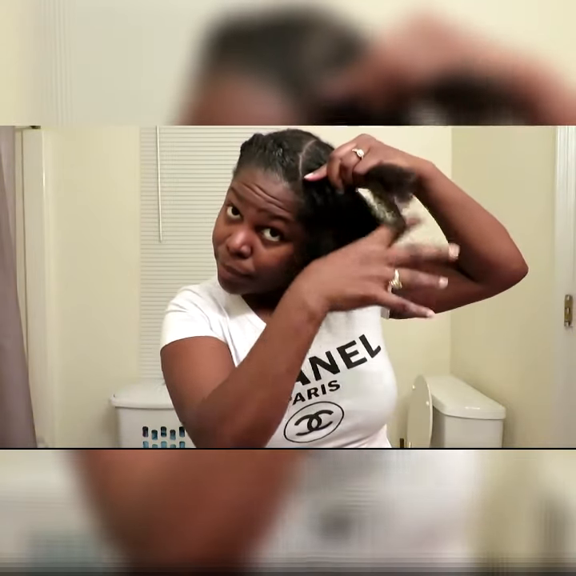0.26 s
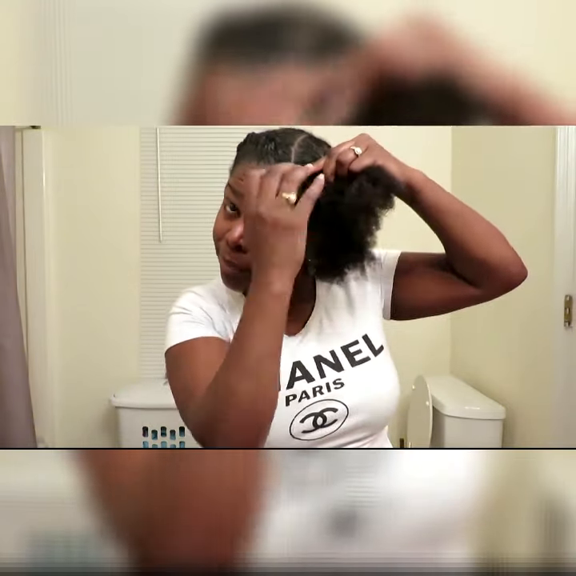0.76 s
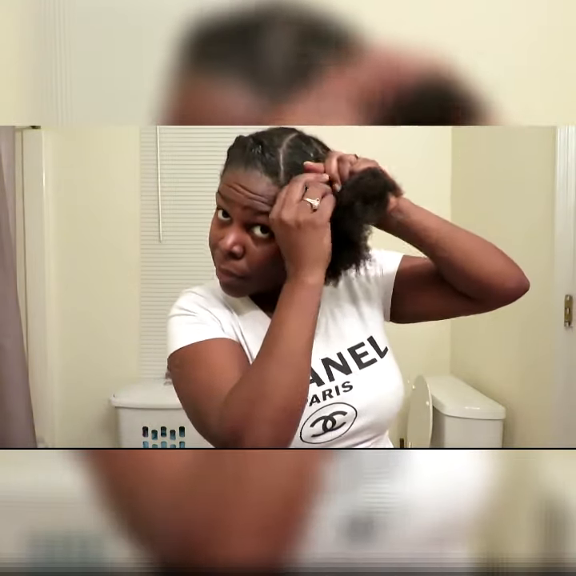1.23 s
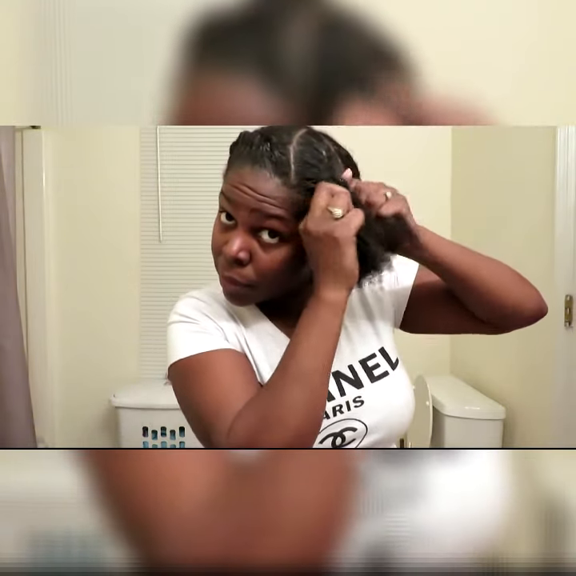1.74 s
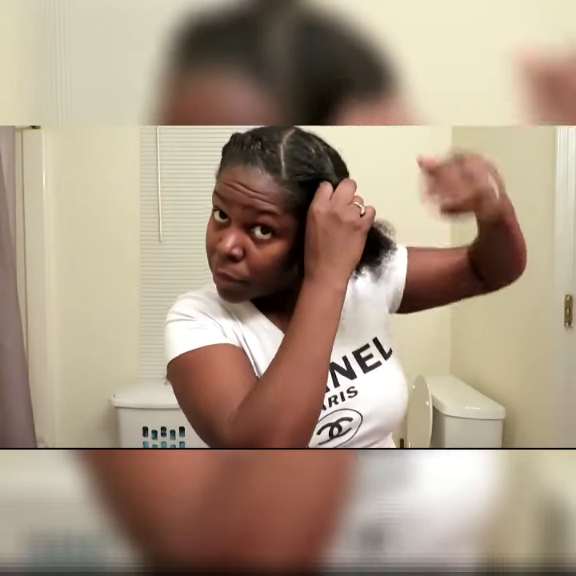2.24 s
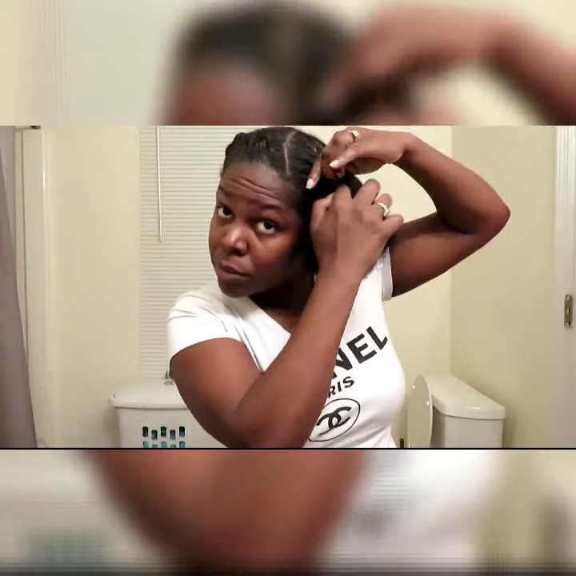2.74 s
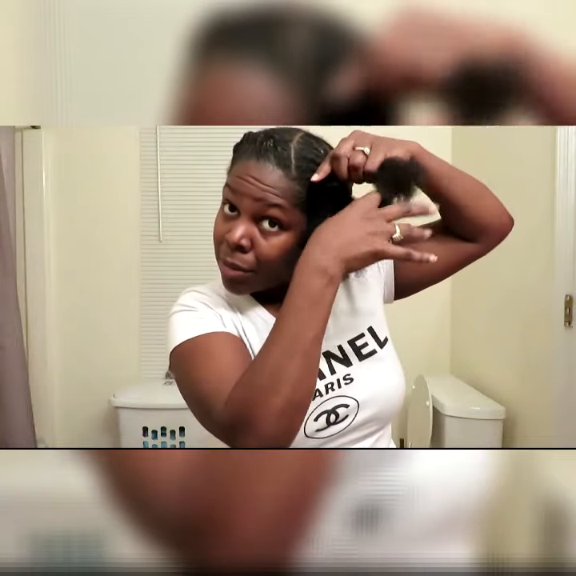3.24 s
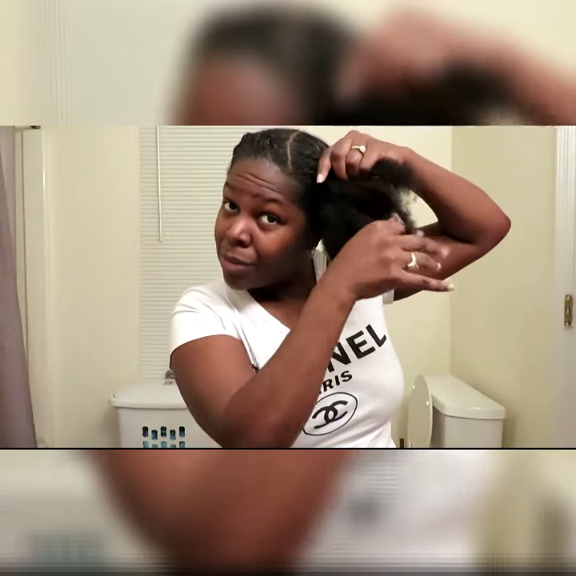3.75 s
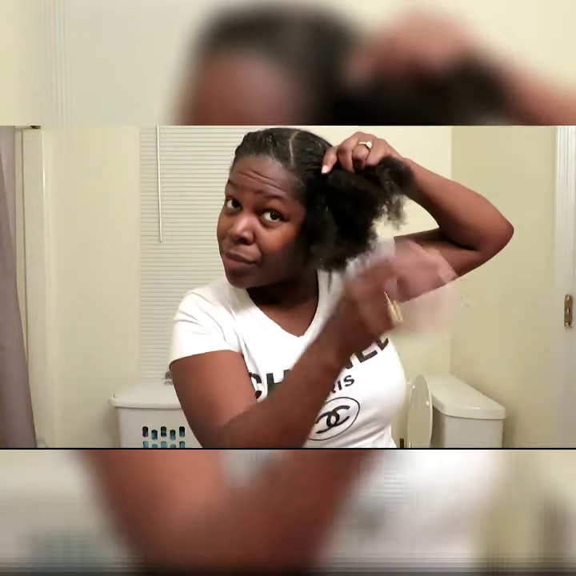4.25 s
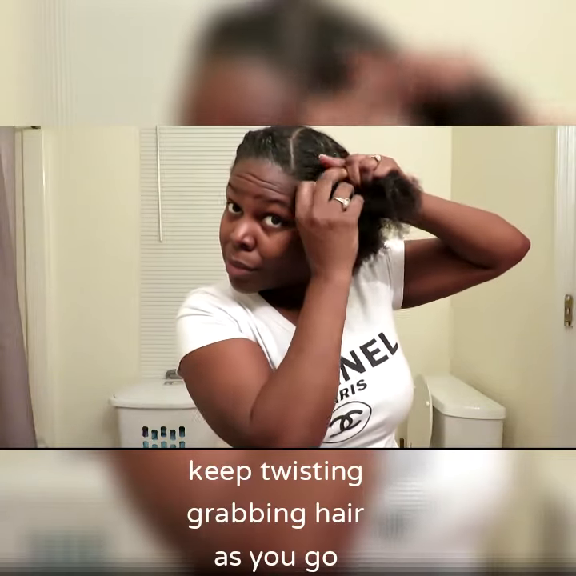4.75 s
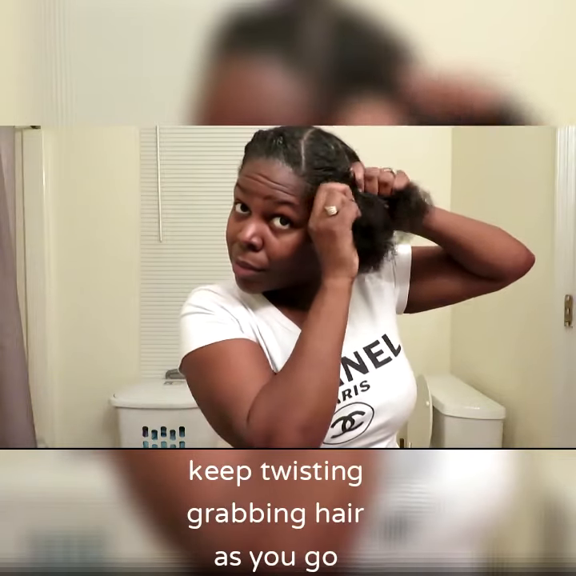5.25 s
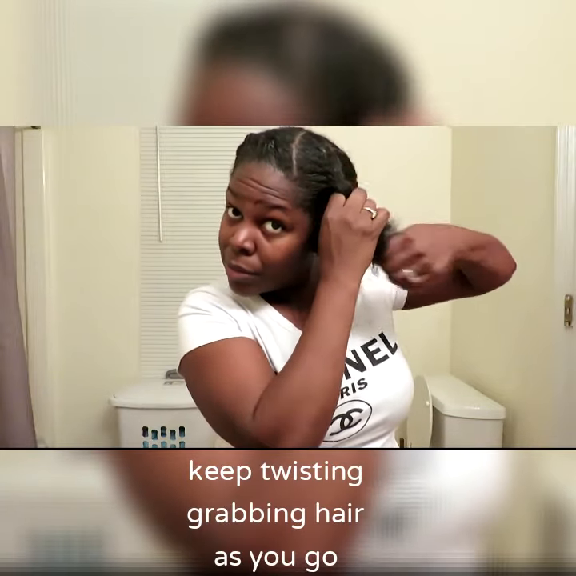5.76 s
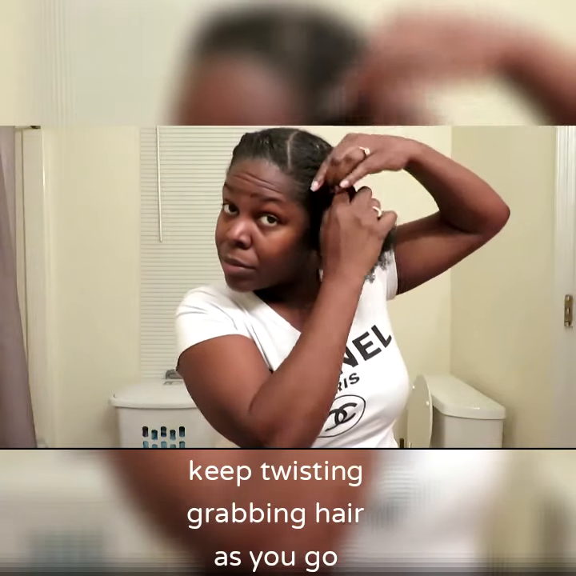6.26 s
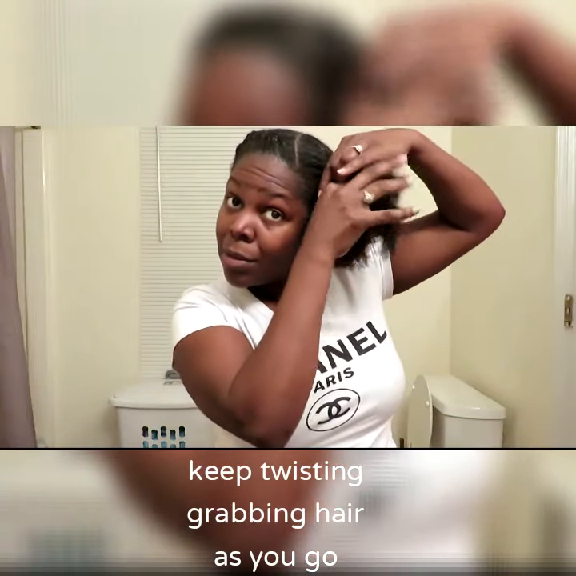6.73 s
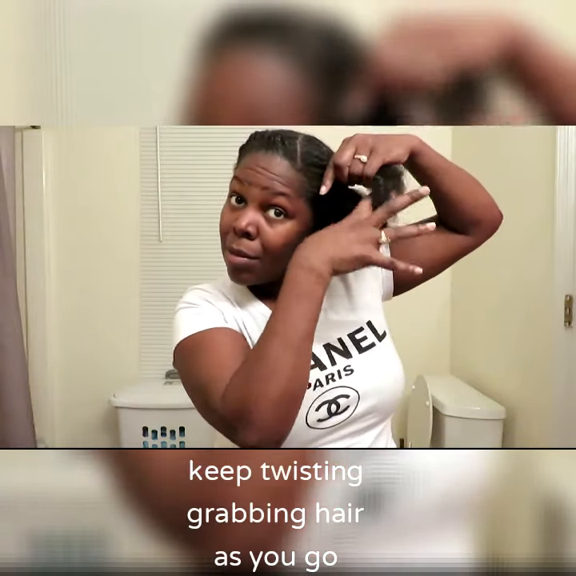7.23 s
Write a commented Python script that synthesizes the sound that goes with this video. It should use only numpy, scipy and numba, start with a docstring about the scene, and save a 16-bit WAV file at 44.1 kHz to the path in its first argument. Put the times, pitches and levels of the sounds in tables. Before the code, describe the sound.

A ventilation fan hums low in a small bathroom while bath water drips and laps quietly, then gets stirred, scooped and splashed with bubbling gurgles.

```python
"""Bath water in a small, hard-walled bathroom, heard in mono: bubbles and drips near, splashes deeper in the room.
A ventilation fan hums throughout. At first the water laps and drips quietly, with a few soft thuds of the tub.
From about 4.5 s it is stirred, scooped and splashed: trapped air rings as single bubbles and gurgling clouds,
spray patters back on the surface, foam sizzles and the tub thuds again. Reflections smear all the water."""
import sys
import numpy as np
from scipy import signal
from scipy.fft import rfft, irfft
from scipy.io import wavfile
from numba import njit

SR = 44100
rng = np.random.default_rng(int(sys.argv[2]) if len(sys.argv) > 2 else 0)


def output_pcm(signal):
    """Save a mono or channel-first signal as 16-bit PCM at the path in sys.argv[1].

    Samples are clipped to [-1, 1] before scaling.
    """
    pcm = np.clip(np.atleast_2d(signal).T, -1, 1) * 32767
    wavfile.write(sys.argv[1], SR, np.round(pcm).astype(np.int16))


N = 330428
T = np.arange(N) / SR  # [s]
BINS = np.maximum(np.fft.rfftfreq(N, 1 / SR), 1)  # [Hz]


def undb(db):
    """Decibels to gain."""
    return 10 ** (np.asarray(db) / 20)


def unit(x):
    """Scale to an rms of one."""
    return x / np.sqrt(np.mean(x ** 2))


def colour(x, points):
    """Filter by a spectrum of (frequency [Hz], level [dB]) points, joined along log frequency."""
    hz, db = np.transpose(points)
    gain = undb(np.interp(np.log(BINS), np.log(hz), db))
    return irfft(rfft(x) * gain, N)


def add(out, s, x):
    """Mix x into out from time s on."""
    i = int(np.clip(s * SR, 0, N - 1))
    out[i:i + len(x)] += x[:N - i]


@njit
def rings(size, starts, hz, cycles, gains, glide, swell):
    """Damped sines: build up over swell cycles, fall 60 dB in so many cycles, pitch rising by the share glide."""
    out = np.zeros(size)
    for k in range(len(starts)):
        first, life = int(starts[k] * SR), cycles[k] * SR / hz[k]
        z = gains[k] + 0j
        # turn and decay per sample, and the slow speeding up of the turn
        p = np.exp((2j * np.pi * hz[k] / SR) - np.log(1000) / life)
        bend = np.exp(2j * np.pi * hz[k] / SR * glide / life)
        for i in range(first, min(size, first + int(life))):
            out[i] += z.imag * min(1., (i - first) * hz[k] / SR / swell)
            z *= p
            p *= bend
    return out


def patter(count, low_hz, high_hz, cycles, scatter_db, glide=0.25, swell=2.26, largest=3.95):
    """A steady rain of tiny bubbles, the higher ones louder; scatter_db makes a few stand out."""
    when, pitch, life, size = rng.random((count, 4)).T
    hz = np.minimum(low_hz * (high_hz / low_hz) ** pitch, SR * .45)
    sizes = undb(scatter_db * np.minimum(-np.log(1 - size), largest)) * hz / high_hz
    return rings(N, when * N / SR, hz, cycles * (0.77 + life), sizes, glide, swell)


def clumps(depth_db, rate=22):
    """Gain of drops that come in irregular bunches, so many a second."""
    knots = rng.standard_normal(400)
    return unit(undb(depth_db * np.interp(T * rate, np.arange(len(knots)), knots)))


# A bubble at the reference pitch [Hz]: build-up and 60 dB fall [s]; both shorten with pitch by the exponent.
BUBBLE_HZ = 1500
BUBBLE_RISE_S, BUBBLE_T60_S, BUBBLE_SHORTEN = 0.0091, 0.032, 0.35
# Its pitch wavers as it rises: wobbles [1/s] and depth [share of the pitch], both at the reference pitch.
WOBBLE_RATE, WOBBLE = 264, 0.034


def bubble(hz, glide=0.18):
    """One bubble swells, rings and dies away, its pitch chirping up and wavering, more so if it is small."""
    age = T[:SR // 16]
    scale = (BUBBLE_HZ / hz) ** BUBBLE_SHORTEN
    life = BUBBLE_T60_S * scale
    wobble = np.interp(age * WOBBLE_RATE / scale, np.arange(64), rng.standard_normal(64))
    pitch = hz * (1 + glide * np.minimum(age / life, 1) + WOBBLE / scale * wobble)
    rise = np.sin(np.pi / 2 * np.minimum(age / (BUBBLE_RISE_S * scale), 1)) ** 2
    decay = np.exp(-np.log(1000) * age / life)
    return rise * decay * np.sin(2 * np.pi * np.cumsum(pitch) / SR)


# The clearest single bubbles and drips near the microphone:
# (time [s], starting pitch [Hz], level before gain and pitch weighting [dB])
BUBBLE_EVENTS = [(.031, 2060, -39), (.074, 1775, -37), (0.073, 2250, -40), (0.096, 4780, -43.5),
                 (0.196, 1486, -32), (.2, 2230, -33), (.258, 1375, -36.5), (.264, 647, -40.5),
                 (.277, 2620, -35.5), (.279, 2080, -47), (.345, 2640, -37.5), (.385, 2620, -50),
                 (0.419, 1307, -38), (.494, 2300, -50), (1.104, 1407, -28), (1.135, 1410, -44),
                 (1.177, 1400, -41), (1.143, 3380, -41), (1.539, 2890, -40.5), (1.739, 2116, -43),
                 (1.804, 2440, -41.5), (1.886, 3180, -41.5), (1.909, 2200, -40), (1.972, 2000, -49),
                 (2.032, 5480, -43), (2.639, 1860, -44.5), (2.806, 3960, -44.5), (3.2, 2125, -36),
                 (3.22, 3830, -47), (3.388, 805, -36.5), (3.39, 2235, -40), (3.39, 4120, -47),
                 (3.42, 757, -37.5), (3.433, 2540, -46), (3.475, 2590, -46), (3.801, 4650, -51),
                 (3.838, 3960, -51), (4.027, 4380, -46), (4.073, 8300, -56), (4.173, 2580, -46),
                 (4.176, 5000, -47.5), (4.298, 1446, -35), (4.31, 2640, -35.5), (4.314, 1478, -32.5),
                 (4.365, 1484, -39), (4.33, 8250, -51), (4.337, 4000, -47), (4.516, 1320, -37),
                 (4.578, 983, -30), (4.595, 2114, -32), (4.722, 2150, -31), (4.825, 1156, -29),
                 (4.872, 1146, -33), (4.926, 2022, -21.5), (5.082, 1000, -31), (5.166, 1168, -23),
                 (5.166, 3210, -25.5), (5.203, 1155, -40), (5.234, 2610, -20.5), (5.237, 2295, -23),
                 (5.275, 2080, -29), (5.236, 5450, -33), (5.28, 5830, -27), (5.346, 1590, -29.5),
                 (5.364, 4000, -25), (5.39, 1193, -26.5), (5.399, 2470, -27.5), (5.435, 750, -27.5),
                 (5.607, 1030, -20.5), (5.654, 838, -20), (5.727, 950, -17), (5.733, 1736, -18.5),
                 (5.831, 1666, -25), (5.864, 3480, -27), (5.869, 3710, -26.5), (5.969, 1282, -19),
                 (5.999, 1285, -28), (6.04, 1256, -23.5), (6.065, 3830, -27), (6.154, 1890, -26.5),
                 (6.186, 2890, -27.5), (6.306, 4560, -33), (6.438, 1954, -21), (6.442, 700, -22.5),
                 (6.555, 3050, -29), (6.571, 965, -27.5), (6.79, 1870, -25.5), (6.833, 951, -17),
                 (6.852, 1053, -19), (6.877, 996, -19.5), (6.905, 944, -25), (6.9, 2750, -27.5),
                 (6.92, 1966, -20.5), (6.942, 897, -24), (6.964, 1378, -22.5), (7.024, 571, -18),
                 (7.026, 2670, -31), (7.06, 445, -25.5), (7.164, 4850, -35.5), (7.348, 762, -23),
                 (7.356, 2880, -23.5), (7.359, 3630, -28), (7.375, 2255, -25.5)]


def bubbles(count=5, gain_db=3, shed_db=-12, shed_s=.055, shed_octaves=0.342):
    """Each air bubble rings at its own pitch and sheds a scatter of lesser ones."""
    out = np.zeros(N)
    for s, hz, db in BUBBLE_EVENTS:
        # small bubbles spend their energy in a shorter, sharper ring
        size = undb(db + gain_db) * (hz / BUBBLE_HZ) ** 0.095
        add(out, s, size * bubble(hz))
        for lag, up, down in rng.random((count, 3)):
            shed_hz = hz * 2 ** (shed_octaves * (up - down))
            add(out, s + shed_s * lag, size * undb(shed_db) * bubble(shed_hz))
    return out


# Gurgles, where a wave folds over a pocket of air:
# (time [s], level [dB], middle pitch [Hz], pitch range [+- octaves], length [s])
GURGLE_EVENTS = [(.002, -57, 590, 0.41, .05), (0.215, -48.5, 1190, 1.26, 0.046),
                 (.275, -50.5, 2180, 0.64, 0.035), (0.344, -52, 1510, 1.08, 0.12),
                 (.347, -52, 403, .6, .04), (0.912, -60, 2860, 0.83, 0.082),
                 (1.12, -54.5, 4100, 0.42, 0.037), (1.808, -63, 2400, 0.58, 0.14),
                 (2.646, -51.5, 497, 1.6, 0.056), (3.235, -51, 298, 1.6, 0.069),
                 (3.391, -51, 1110, 0.82, 0.04), (3.46, -54.5, 1360, 1.1, 0.037),
                 (4.559, -44, 1244, 0.83, 0.049), (4.74, -44, 425, 2.03, 0.084),
                 (4.831, -42, 1410, 0.95, 0.062), (5.079, -39.5, 866, 1.52, .06),
                 (5.347, -37.5, 4150, 0.72, 0.044), (5.388, -44, 1690, 1.1, 0.036),
                 (5.431, -39.5, 773, 0.75, .04), (5.653, -34, 692, 0.78, .035),
                 (5.661, -49, 213, 0.53, 0.074), (5.686, -33, 1250, 1.17, 0.04),
                 (5.715, -27.5, 1300, 1.49, .04), (5.991, -43, 1160, 0.61, 0.052),
                 (6.414, -28.5, 1480, 0.46, 0.032), (6.419, -37, 699, 1.14, 0.059),
                 (6.433, -28.5, 1326, 0.86, 0.039), (6.533, -39.5, 985, 0.88, 0.12),
                 (6.827, -28.5, 986, 0.44, 0.044), (7.023, -33.5, 589, 0.7, 0.034),
                 (7.026, -35, 322, 0.83, 0.028), (7.203, -42, 1670, 0.59, 0.046),
                 (7.332, -35.5, 767, 0.41, 0.049)]


def gurgles(count=64, cycles=14.9, scatter_db=5.0, glide=0.24, swell=1.64):
    """A pocket of air breaks into a cloud of bubbles, thick at first and then thinning."""
    out = np.zeros(N)
    for s, db, hz, octaves, length in GURGLE_EVENTS:
        order = (np.arange(count) + rng.random(count)) / (count + 1)
        delay = length * -np.log(1 - order) / 2
        pitch = hz * 2 ** (octaves * (rng.random(count) - rng.random(count)))
        pitch = np.minimum(pitch, SR / 4)
        sizes = undb(scatter_db * rng.standard_normal(count)) * np.exp(-delay / length / 2)
        cloud = rings(SR // 2, delay, pitch, cycles * (.5 + rng.random(count)), sizes, glide, swell)
        # the level is that of the whole cloud's energy, spread over its length
        add(out, s, cloud * undb(db) * np.sqrt(length * SR / np.sum(cloud ** 2)))
    return out


SLAP_RISE_S, SLAP_S = 0.011, 0.03  # the spray swells, then fades
# Spectra of the drops and of the mist: (frequency [Hz], relative level [dB])
DROP_SPECTRUM = [(300, -21), (1000, -1.5), (2500, 1.5), (4000, 0.5), (6000, -5), (8500, -51), (12000, -45),
                 (15500, -60)]
MIST_SPECTRUM = [(2000, -27), (4500, -2), (6500, 1), (8500, -4), (12000, -14.5), (15500, -35)]
# Slaps of spray on the surface: (time [s], level [dB], fine mist relative to the drops [dB])
SLAP_EVENTS = [(.248, -56, -5), (.354, -64, 1), (.624, -65, 7), (1.116, -50.5, -11), (1.434, -60.5, 8.5),
               (1.69, -60, 1), (3.214, -51, -12), (4.318, -51.5, -8), (4.492, -50.5, 0), (4.512, -44, -9),
               (4.56, -40.5, -20), (4.764, -62, 11), (4.821, -41, -7), (5.053, -32.5, -2.5),
               (5.39, -34.5, -9), (5.569, -33, -4.5), (5.689, -41, -11), (5.854, -32.5, -27),
               (6.112, -33.5, -31), (6.627, -36.5, -12), (6.779, -56, 4), (7.018, -53, -19),
               (7.203, -35, -11.5), (7.35, -45, 2.5)]


def spray():
    """Each slap throws drops and a finer mist, which land in a quickly swelling, fading crackle."""
    drop_flow, mist_flow = np.zeros(N), np.zeros(N)
    age = T[:SR // 2]
    shape = np.minimum(age / SLAP_RISE_S, 1) * np.exp(-(age / SLAP_S) ** 2 / 2)
    for s, db, mist_db in SLAP_EVENTS:
        add(drop_flow, s, undb(db) * shape)
        add(mist_flow, s, undb(db + mist_db) * shape)
    drops = patter(count=15000, low_hz=631, high_hz=15470, cycles=23, scatter_db=4.0, swell=4.3, largest=3.2)
    mist = patter(count=50000, low_hz=3400, high_hz=17600, cycles=36, scatter_db=0.0)
    return drop_flow * unit(colour(drops, DROP_SPECTRUM)) + mist_flow * unit(colour(mist, MIST_SPECTRUM))


# Drops that strike the surface with a sharp tick:
# (time [s], level before gain [dB], pitch about which the noise band lies [Hz])
TICK_EVENTS = [(0.075, -40, 2450), (.22, -45, 4470), (.253, -45, 5000), (.276, -40, 2470),
               (.345, -53, 6000), (.63, -49, 8700), (1.121, -49, 4500), (1.74, -48, 2420),
               (2.032, -51, 5500), (2.808, -51, 4200), (3.389, -50, 3000), (4.029, -52, 4500),
               (3.463, -45, 1800), (4.314, -41, 3000), (4.515, -32.5, 5000), (4.62, -35.5, 5040),
               (4.772, -42, 7500), (4.845, -31.5, 4450), (5.061, -33, 6500), (5.084, -32, 3500),
               (5.405, -33, 5000), (5.584, -24, 4500), (5.678, -26.5, 3980), (5.734, -35, 3470),
               (5.867, -34, 4380), (6.12, -39, 4140), (6.188, -29.5, 3470), (6.418, -22, 2030),
               (6.629, -41, 5000), (6.705, -31, 4700), (6.787, -39, 5000), (6.858, -28.5, 1380),
               (6.966, -28, 1600), (7.029, -30.5, 4530), (7.201, -32, 5000), (7.331, -31, 4830),
               (7.361, -29, 3960)]


def ticks(count=4, gain_db=-10, peak_s=0.0015, rebound_db=-11, rebound_s=.035):
    """A drop hits with a short, wide crack, and a few droplets thrown up by it land just after."""
    out = np.zeros(N)
    age = T[:SR // 50]
    shape = age / peak_s * np.exp(1 - age / peak_s)
    for s, db, hz in TICK_EVENTS:
        band = signal.butter(3, [hz / 2, min(hz * 1.31, SR * .45)], "band", fs=SR, output="sos")
        noise = unit(signal.sosfilt(band, rng.standard_normal((count + 1, len(age)))))
        cracks = noise * shape * undb(db + gain_db)
        add(out, s, cracks[0])
        for crack, lag in zip(cracks[1:], rng.random(count)):
            add(out, s + rebound_s * lag, crack * undb(rebound_db))
    return out


FOAM_S = 0.13  # time constant of the foam's power as it fizzes away
# Spectrum of the bursting froth: (frequency [Hz], relative level [dB])
FOAM_SPECTRUM = [(2000, -24), (4000, -0.5), (6500, -3.5), (9000, -10), (12000, -15.5), (15500, -35)]


def foam(gain_db=-22.0):
    """The froth left by the slaps bursts in a dense, fine sizzle that outlasts the spray."""
    froth = np.zeros(N)  # power, so that overlapping foam adds up
    age = T[:2 * SR]
    for s, db, mist_db in SLAP_EVENTS:
        add(froth, s, undb(db + gain_db) ** 2 * np.minimum(age / SLAP_S, 1) * np.exp(-age / FOAM_S))
    pops = patter(count=24000, low_hz=3570, high_hz=15000, cycles=15, scatter_db=0, swell=2.0)
    return np.sqrt(froth) * unit(colour(pops, FOAM_SPECTRUM)) * clumps(depth_db=1.5)


# The water draws back before it strikes: depth of the lull, its length before a slap and before a gurgle.
DRAW_BACK_DB, SLAP_LULL_S, GURGLE_LULL_S = -3, 0.11, 0.24


def lulls():
    """Gain of the stirred water, which ebbs briefly before each slap and each gurgle."""
    ebb = np.zeros(N)
    for table, length in ((SLAP_EVENTS, SLAP_LULL_S), (GURGLE_EVENTS, GURGLE_LULL_S)):
        for row in table:
            add(ebb, row[0] - length * 0.97, np.hanning(int(length * SR)))
    return undb(DRAW_BACK_DB * np.minimum(ebb, 1))


# Spectra of large bubbles and of fine running water: (frequency [Hz], relative level [dB])
CHURN_SPECTRUM = [(150, -5.5), (400, -8), (800, -2), (1300, -1.5), (2200, -1.5), (3500, -10.5), (6000, -22)]
TRICKLE_SPECTRUM = [(1000, -65), (2500, 1.5), (4200, 0), (6000, -6.5), (8500, -13.5), (12000, -27),
                    (15500, -40)]
# How strongly the water is stirred: (time [s], level before the churn and trickle gains [dB])
STIR_LEVEL = [(4.45, -58), (4.59, -52.5), (4.69, -48), (4.9, -48.5), (5.26, -39.5), (5.45, -41),
              (5.53, -40.5), (5.65, -34.5), (5.79, -39), (6.24, -49), (6.38, -40), (6.49, -40), (6.61, -46),
              (6.9, -39), (7.03, -39.5), (7.15, -53), (7.27, -40.5), (7.41, -39.5), (7.49, -45.5)]


def stirring(churn_db=1.5, trickle_db=-3.5):
    """Stirred water churns up bunches of bubbles, and runs back in a fine trickle."""
    stir = lulls() * undb(np.interp(T, *np.transpose(STIR_LEVEL), left=-np.inf))
    large = patter(count=12000, low_hz=166.6, high_hz=4996, cycles=19.6, scatter_db=4, largest=3.8)
    small = patter(count=16000, low_hz=1764, high_hz=16350, cycles=25.0, scatter_db=5.0, largest=3.5, swell=3.6)
    churn = unit(colour(large, CHURN_SPECTRUM)) * undb(churn_db) * clumps(depth_db=1.0)
    trickle = unit(colour(small, TRICKLE_SPECTRUM)) * undb(trickle_db) * clumps(depth_db=0.5)
    return stir * (churn + trickle)


# How strongly the water laps until it is stirred: (time [s], level before the churn and trickle gains [dB])
LAP_LEVEL = [(0.0, -53), (0.32, -54.5), (0.76, -60.5), (1.35, -57.5), (2.4, -64), (3.47, -59), (3.63, -65),
             (4.28, -59.5), (4.45, -57.5)]


def lapping(churn_db=-3, trickle_db=-10.5):
    """Gently lapping water makes a faint, even murmur of bubbles and hardly trickles."""
    lap = undb(np.interp(T, *np.transpose(LAP_LEVEL), right=-np.inf))
    large = patter(count=18000, low_hz=176.7, high_hz=4880, cycles=18.7, scatter_db=6.0)
    small = patter(count=14000, low_hz=1773, high_hz=15600, cycles=16, scatter_db=8.0)
    churn = unit(colour(large, CHURN_SPECTRUM)) * undb(churn_db)
    trickle = unit(colour(small, TRICKLE_SPECTRUM)) * undb(trickle_db)
    return lap * (churn + trickle)


# Soft thuds of the tub wall: (time [s], pitch [Hz], level at the onset [dB])
THUD_EVENTS = [(0.554, 62, -31.5), (0.582, 76, -27.5), (0.61, 70.6, -35), (3.184, 85, -39),
               (3.235, 80, -37), (5.073, 73.4, -42), (5.594, 51, -40), (5.672, 140, -28)]


def thuds(cycles=12.):
    """The tub wall booms briefly when it is pushed, falling 60 dB in so many cycles."""
    s, hz, db = np.transpose(THUD_EVENTS)
    return rings(N, s, hz, np.full(len(s), cycles), undb(db), 0., 0.057)


BUILD_S = .003  # time constant of the reflections' build-up


def bathroom(x, direct_db, wet_db, count=4, t60_low=0.39, t60_high=0.25, roam_hz=2.3):
    """Close, hard walls answer with dense reflections, which change as the sound roams about the tub."""
    age = T[:SR]
    low_pass = signal.butter(2, 3000, fs=SR, output="sos")
    high_pass = signal.butter(2, 3000, "high", fs=SR, output="sos")
    out = undb(direct_db) * x
    for spot in range(count):
        low = signal.sosfilt(low_pass, rng.standard_normal(SR))
        high = signal.sosfilt(high_pass, rng.standard_normal(SR))
        # the treble dies sooner
        tail = low * np.exp(-np.log(1000) * age / t60_low) + high * np.exp(-np.log(1000) * age / t60_high)
        tail *= 1 - np.exp(-age / BUILD_S)
        # each spot has its own reflections and its turn in the circuit
        share = np.maximum(np.cos(2 * np.pi * (roam_hz * T - spot / count)), 0)
        out = out + undb(wet_db) * signal.fftconvolve(x * share, tail / np.linalg.norm(tail))[:N]
    return out


# Spectrum of the fan's rushing air: (frequency [Hz], relative level [dB])
AIR_SPECTRUM = [(20, -10.5), (35, -7), (59, 0), (100, -26), (129, 0.5), (200, -9.5), (320, -18),
                (550, -19.5), (800, -22.5), (1200, -25), (2400, -31.5), (5000, -33.5), (10000, -43),
                (15500, -53.5)]
# Room and duct resonances that the fan keeps ringing:
# (frequency [Hz], offset at which the amplitude halves [Hz], level [dB])
RESONANCES = [(46.6, 12, -79), (78, 3.7, -66.5), (82, 16, -53), (134.4, 4.3, -54), (234, 6.9, -65),
              (275, 20, -60.5), (405, 90, -59.5), (772, 155, -62)]


def fan(air_db=-51.5, mains_db=-54, mains_hz=120):
    """Rushing air, the resonances that it feeds, and the motor's mains hum."""
    out = unit(colour(rng.standard_normal(N), AIR_SPECTRUM)) * undb(air_db)
    for hz, width, db in RESONANCES:
        spectrum = rfft(rng.standard_normal(N)) / (1 + ((BINS - hz) / width) ** 2)
        out += undb(db) * unit(irfft(spectrum, N))
    return out + undb(mains_db) * np.sqrt(2) * np.sin(2 * np.pi * mains_hz * T)


def scene():
    """Bubbles, drops and foam near at the open surface, splashes down in the tub, and the fan."""
    clear = bathroom(bubbles() + ticks() + foam(), direct_db=5.0, wet_db=4.0)
    splashes = bathroom(gurgles() + spray() + lapping() + stirring(), direct_db=-3.5, wet_db=-1.23)
    return (clear + splashes + thuds() + fan())[None]


def record(dry, top_hz=15650):
    """The recorder behind the microphone cuts the top steeply."""
    return signal.sosfilt(signal.ellip(10, .2, 80, top_hz, fs=SR, output="sos"), dry)


dry = scene()
out = record(dry)
output_pcm(out)
```